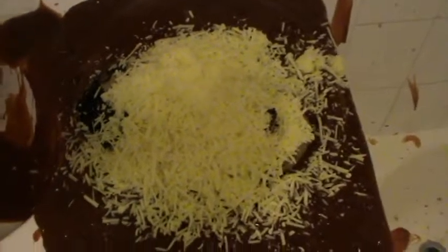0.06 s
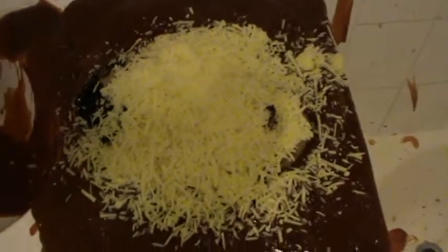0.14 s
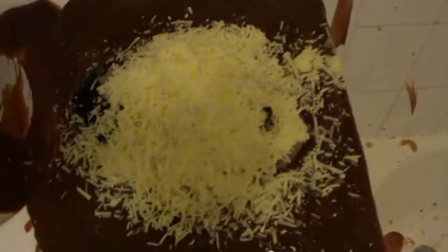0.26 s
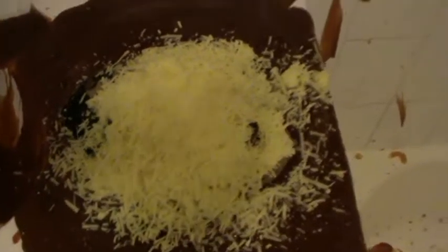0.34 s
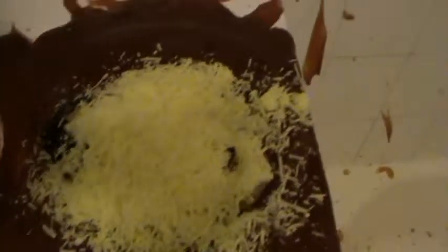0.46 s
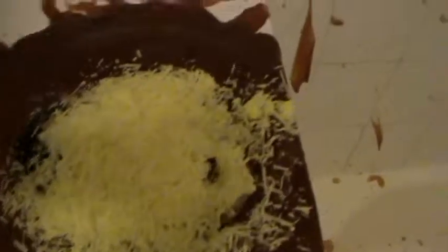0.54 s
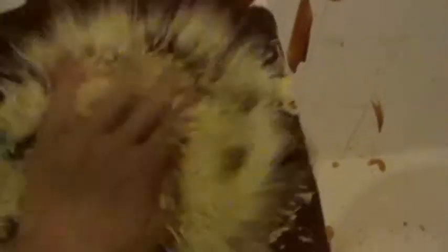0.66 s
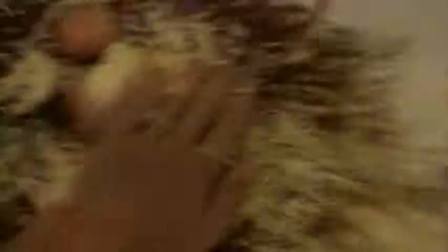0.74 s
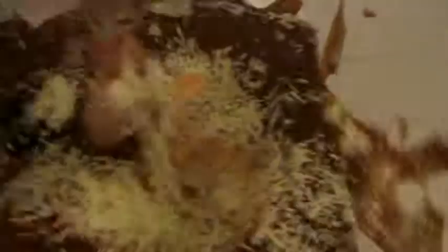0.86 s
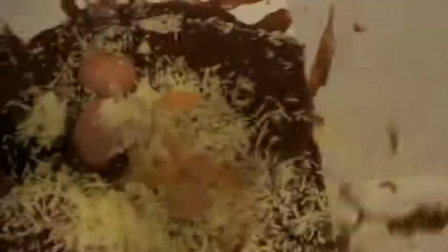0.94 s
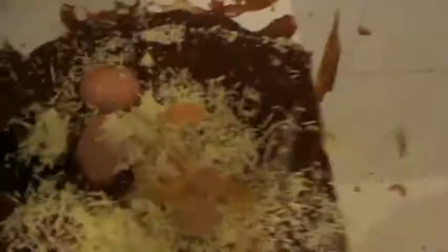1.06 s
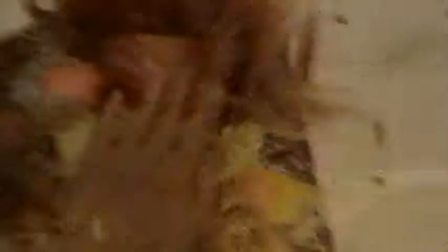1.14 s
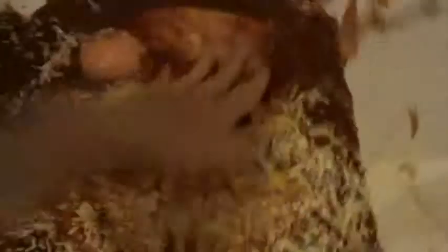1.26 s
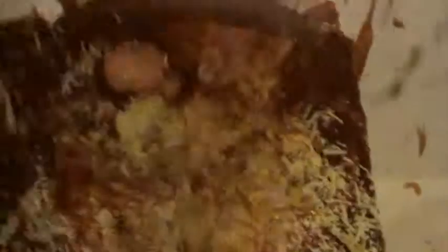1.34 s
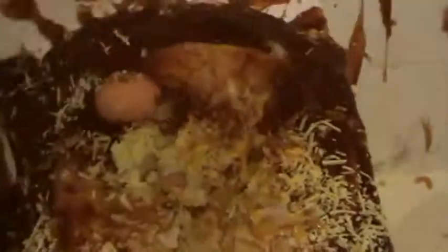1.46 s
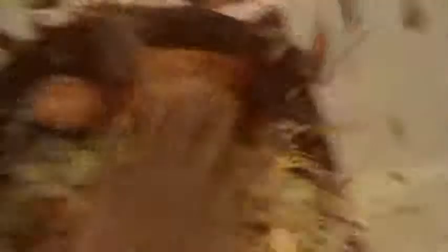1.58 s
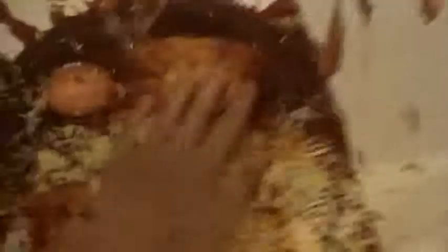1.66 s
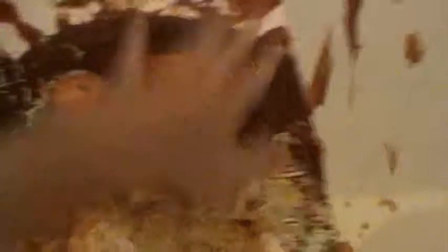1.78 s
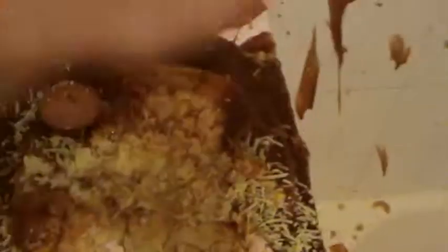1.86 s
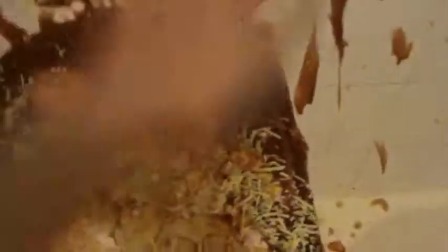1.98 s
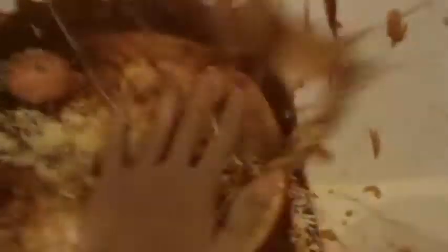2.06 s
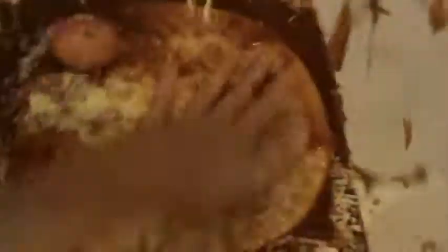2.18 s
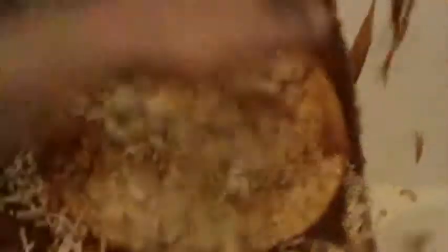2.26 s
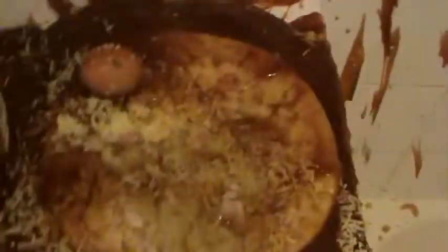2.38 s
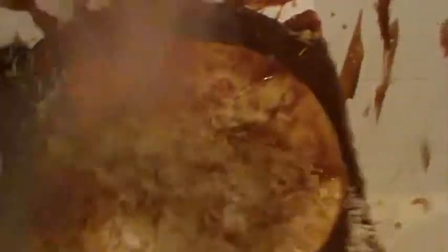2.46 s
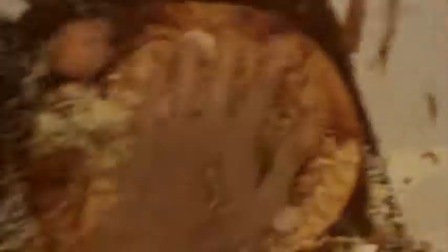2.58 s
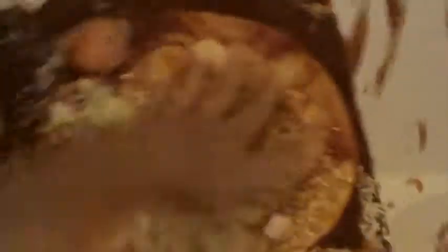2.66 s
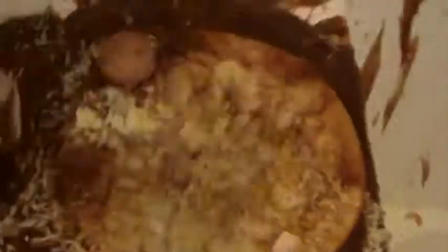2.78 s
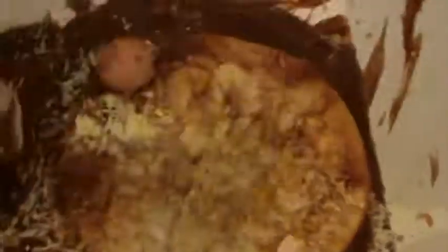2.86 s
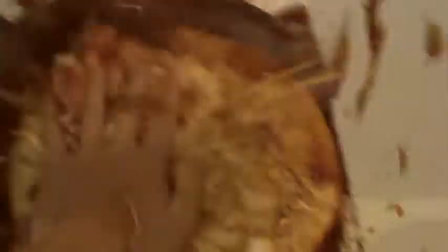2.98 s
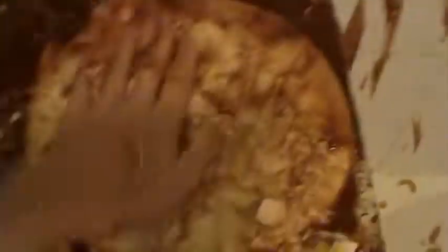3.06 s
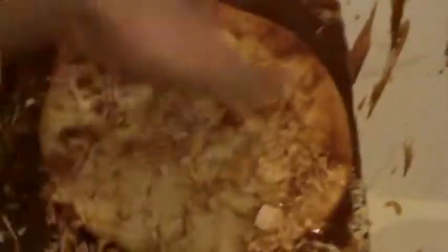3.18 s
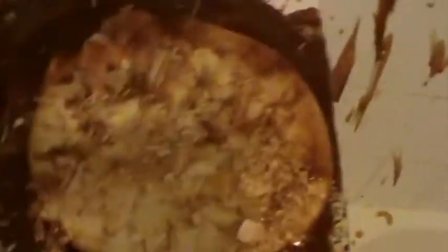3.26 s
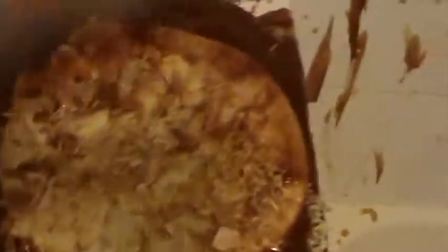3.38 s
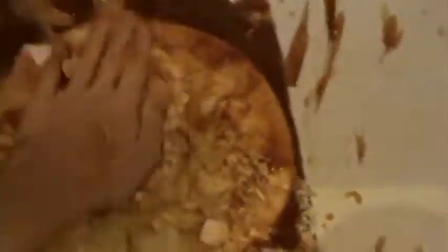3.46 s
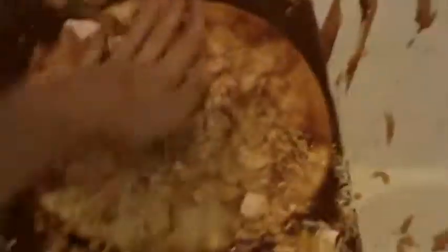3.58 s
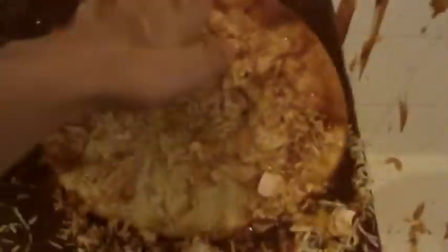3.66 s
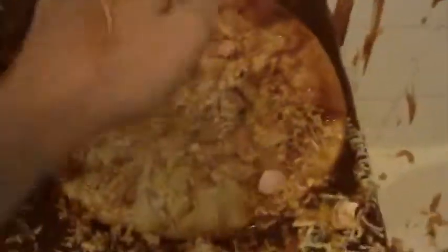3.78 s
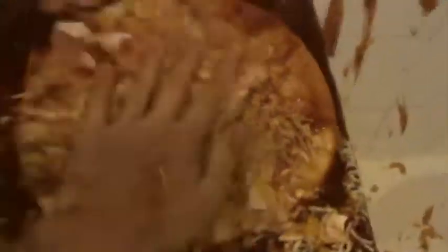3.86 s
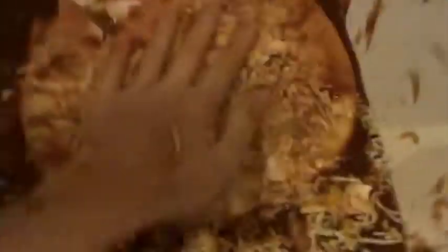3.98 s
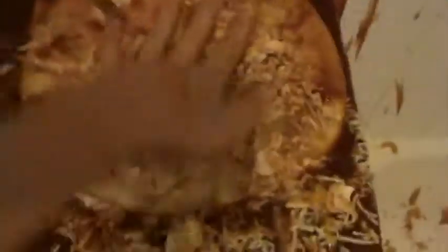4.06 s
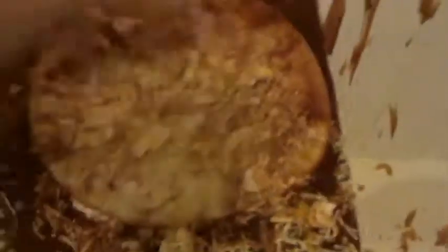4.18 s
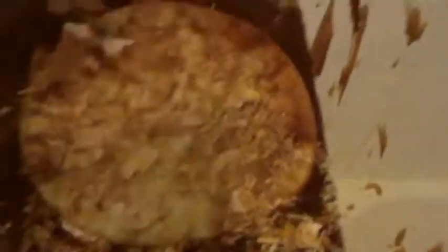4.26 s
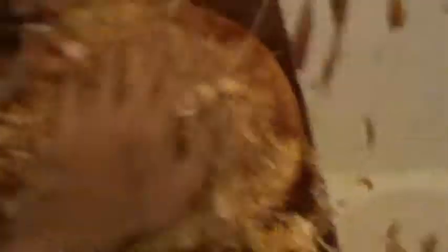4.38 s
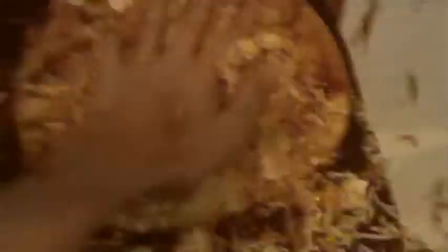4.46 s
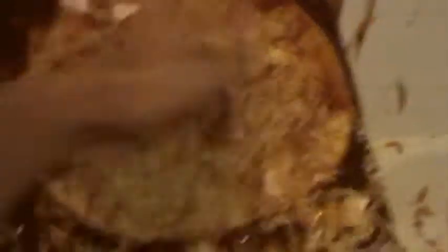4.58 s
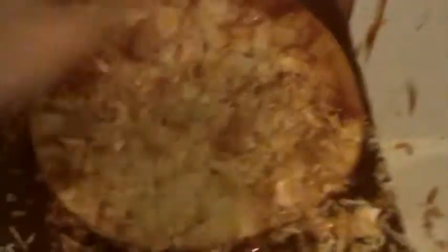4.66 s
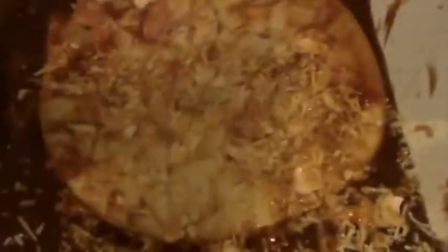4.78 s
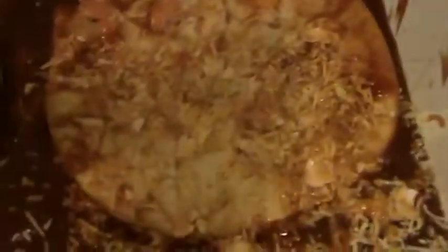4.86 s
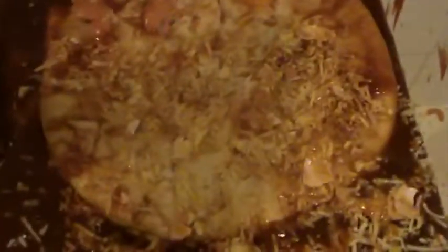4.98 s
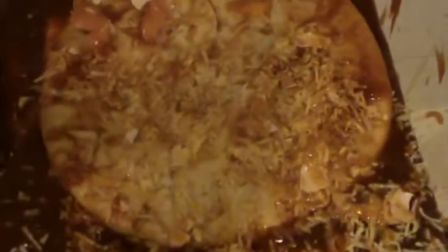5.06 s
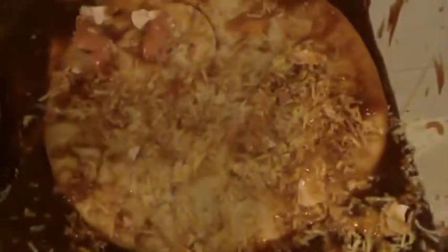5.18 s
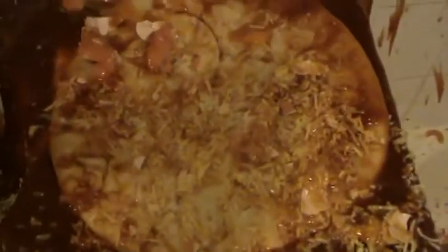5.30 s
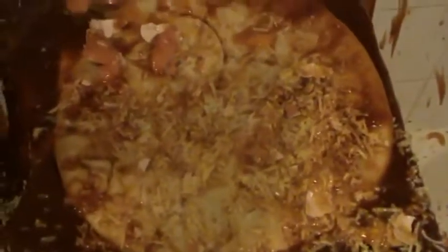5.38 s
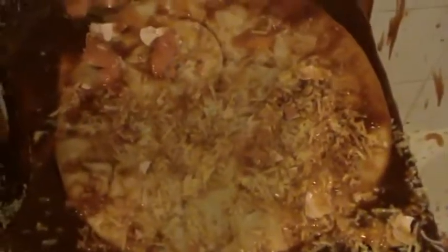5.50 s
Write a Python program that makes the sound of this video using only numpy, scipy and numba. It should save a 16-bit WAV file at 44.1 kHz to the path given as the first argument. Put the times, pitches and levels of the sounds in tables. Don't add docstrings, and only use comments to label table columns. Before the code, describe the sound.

In a small reverberant room, a palm strikes a messy heap of food over and over. Early blows are crunchy and mushy, with clicks of shell and wet plops between; later ones are short, bright cracks with woody booms underneath. Fingertips tap just ahead of some slaps. A hand-held camera close by hisses and ticks faintly, and its limiter flattens the peaks. After the final slap only reverberation and tiny drips remain.

```python
import sys
import numpy as np
from scipy import signal
from scipy.fft import rfft, irfft
from scipy.io import wavfile
from scipy.ndimage import uniform_filter1d
from numba import njit

SR = 44100
rng = np.random.default_rng(int(sys.argv[2]) if len(sys.argv) > 2 else 0)


def boost(x):
    u = np.asarray(x, float) / 20
    return 10 ** u


def to_wav(s):
    ch = np.atleast_2d(s).T
    pcm = np.round(np.clip(ch, -1, 1) * 32767)
    wavfile.write(sys.argv[1], SR, pcm.astype(np.int16))


N = 243873
T = np.arange(N) / SR
SPOTS = 4


def on_log(hz, table, column=1):
    table = np.array(table, float)
    return np.interp(np.log(hz + 1), np.log(table[:, 0] + 1), table[:, column])


def unit(x):
    return x / np.sqrt(np.mean(x ** 2))


def cut(x, hz, kind, order=2):
    return signal.sosfilt(signal.butter(order, hz, kind, fs=SR, output="sos"), x)


def around(x, hz, width):
    return cut(x, [(1 - width) * hz, (1 + width) * hz], "band", order=1)


def add(track, s, x):
    i = int(s * SR)
    x = x[..., :N - i]
    track[..., i:i + x.shape[-1]] += x


def feed(track, k, s, direct, send):
    add(track[0], s, direct)
    add(track[1 + k % SPOTS], s, send)


# (frequency [Hz], density [dB per Hz])
HISS_SPECTRUM = [(25, -10), (60, -9), (130, 1), (250, -7), (400, -8.5), (700, -15), (2000, -16),
                 (5000, -23), (11000, -25.5), (15000, -34.5), (16500, -26)]


def camera(tick_hz=4800, overtone_hz=2013, tick_db=-53, weak_db=-5, hiss_db=-52.5, duck_db=-7):
    hz = np.fft.rfftfreq(N, 1 / SR)
    like = on_log(hz, [(60, 1.0), (300, 0.94), (700, .5), (1400, 0.046), (4000, 0.11), (8000, 0.21),
                       (15000, 0.86)])
    noise = rfft(rng.standard_normal((2, N))) * boost(on_log(hz, HISS_SPECTRUM))
    mid, side = noise * np.sqrt([1 + like, 1 - like])
    hiss = boost(hiss_db) * irfft(np.array([mid + side, mid - side]), N) / np.std(irfft(mid, N))

    ticks, t = np.zeros(N), T[:1024]
    for k, s in enumerate(np.arange(.035, N / SR, .04)):
        ring = np.sin(2 * np.pi * tick_hz * t) + 0.79 * np.sin(2 * np.pi * overtone_hz * t)
        level_db = tick_db + weak_db * (1 - k % 2) + 1.5 * rng.standard_normal()
        add(ticks, s, boost(level_db) * ring * np.exp(-t / .004))
    ticks = ticks * boost(-3.0 * (T > 1))
    return (hiss + ticks) * boost(duck_db * (T > BLOWS[0][0]))


# (time [s], level [dB])
RUSTLE_LEVEL = [
    (0.0, -60),
    (.058, -57),
    (.102, -51),
    (.3, -53.5),
    (.35, -60),
    (.62, -63),
    (.69, -59.5),
]


def rustle(treble_db=-11, puff_db=-41):
    s, db = np.transpose(RUSTLE_LEVEL)
    steps = np.repeat(rng.standard_normal(N // 256 + 1), 256)[:N]
    grain = boost(1.9 * uniform_filter1d(steps, 256))
    noise = rng.standard_normal((3, N))
    low = unit(cut(noise[0] + 0.53 * noise[1:], [250, 800], "band"))
    high = unit(cut(noise[1:], [1200, 11000], "band")) * boost(treble_db)
    puff = boost(puff_db) * np.sin(np.pi * np.clip((T - .675) / 0.047, 0, 1)) ** 2
    return (low + high) * grain * boost(np.interp(T, s, db, right=-120)) + puff


# (frequency [Hz], level [dB], T60 [s], left-right likeness [0-1])
ROOM_BANDS = [(200, 6, 0.99, .95), (400, 5, 0.8, 1), (825, 2, 0.58, 0.1), (1660, 2.5, 0.4, 0.56),
              (3240, -3.5, 0.4, 0.54), (5460, -4.5, 0.4, 0.12), (10400, -8.5, 0.32, 0.9),
              (13400, -21.5, 0.42, 1), (18400, -31.5, 0.27, 1)]


def room(track, build_s=0.0029, near_hz=11000, spread=0.13, tail_db=-27):
    t = T[:SR]
    hz = np.fft.rfftfreq(SR, 1 / SR)
    mid, side = rfft(rng.standard_normal((2, SPOTS, SR)))
    tail = np.zeros((2, SPOTS, SR))
    for centre_hz in 150 * 2 ** (np.arange(14) / 2):
        mask = np.cos(np.pi * np.clip(np.log2(hz / centre_hz + 1e-9), -.5, .5)) ** 2
        like = np.clip(on_log(centre_hz, ROOM_BANDS, column=3), 0, 1)
        m = irfft(mid * mask) * np.sqrt(1 + like)
        s = irfft(side * mask) * np.sqrt(1 - like)
        t60_s = on_log(centre_hz, ROOM_BANDS, column=2)
        tail += np.array([m + s, m - s]) * boost(on_log(centre_hz, ROOM_BANDS) - 60 * t / t60_s)
    tail *= boost(tail_db) * (1 - np.exp(-t / build_s))
    near = spread * rng.standard_normal((2, 24))
    near[:, 0] = 1
    direct = signal.fftconvolve(cut(track[:1], near_hz, "low"), near, axes=1)[:, :N]
    echoes = signal.fftconvolve(track[None, 1:], tail, axes=2)[..., :N].sum(axis=1)
    return direct + echoes


# (time [s], peak [dB], pitch [Hz], bright part [dB])
SAUCE_SPLASHES = [(.092, -35, 4900, -4), (1.111, -18.5, 3060, -10.5), (1.431, -3, 2030, -10.5),
                  (1.8575, -11, 2340, -4.5), (2.0446, -19.5, 5950, -9), (2.3616, -20.5, 2500, 12),
                  (2.5301, -34, 1880, 13), (2.8209, -37.5, 2350, 18), (3.4384, -31.5, 4170, -1),
                  (4.111, -36.5, 2090, -8.5), (4.2609, -23.5, 4200, 4), (4.5696, -20, 2050, -9),
                  (4.911, -47, 4240, 9), (5.0881, -54, 5290, 16.5), (5.4217, -33.5, 2580, 2)]
# (time [s], peak [dB], pitch [Hz], extra room [dB])
CRUMB_TICKS = [(.2213, -48, 3060, 5.5), (.6297, -46, 1600, 4), (.9802, -24, 3000, 2),
               (1.129, -17.5, 1850, -5), (1.3278, -25, 2420, 15), (1.4386, -12, 1830, 6.5),
               (1.72, -9.5, 2050, 3.5), (2.4814, -46, 2610, 3), (2.5154, -33.5, 4070, 8.5),
               (3.356, -37.5, 2360, 1), (3.7, -19, 2020, -14), (4.5904, -38, 2350, -9),
               (4.6615, -23, 3900, -11), (4.809, -37, 4410, 7), (5.004, -38, 4260, 1.5)]
# (time [s], peak [dB], pitch [Hz])
LUMP_PLOPS = [
    (.987, -29, 1700),
    (1.1413, -24.5, 2330),
    (1.5421, -17, 2055),
    (1.761, -11, 2680),
    (3.9103, -40.5, 1830),
    (4.0774, -41.5, 1960),
]


def crumbs(gain_db=13, wet_db=4, ring_width=0.1):
    out, t = np.zeros((1 + SPOTS, N)), T[:512]
    # (s, peak dB, Hz, dull dB, bright dB, room dB, ring dB)
    splashes = [(s, db, hz, -34, bright_db, 1.5, -1) for s, db, hz, bright_db in SAUCE_SPLASHES]
    ticks = [(s, db, hz, -16, -5.5, room_db, 8) for s, db, hz, room_db in CRUMB_TICKS]
    plops = [(s, db, hz, 18.5, 4, 2.5, -1.5) for s, db, hz in LUMP_PLOPS]
    for k, (s, db, hz, dull_db, bright_db, room_db, ring_db) in enumerate(splashes + ticks + plops):
        click = rng.standard_normal(len(t)) * np.exp(-t / 0.00081)
        push = boost(wet_db + room_db) * (t == 0)
        click = cut(np.array([click / np.linalg.norm(click), push]), 1000, "high")
        dull = boost(dull_db - 9) * cut(click, 3100, "low")
        middle = cut(cut(click, 3800, "low"), 2840, "high")
        ring = boost(ring_db) * around(click, hz, ring_width)
        bright = boost(bright_db) * cut(click, 6700, "high")
        feed(out, k, s, *boost(db + gain_db) * (dull + middle + ring - bright))
    return out


# (time [s], peak [dB], pitch [Hz], rise [s])
FINGER_TAPS = [(.3125, -43.5, 3560, 0.0016), (.855, -20, 2650, 0.0033), (.992, -25.5, 3970, 0.001),
               (1.012, -24.5, 2040, 0.0023), (1.4385, -4, 2210, .0004), (2.3615, -15.5, 2520, 0.00071),
               (2.5525, -10.5, 1200, 0.0013), (2.94, -41, 1700, .001), (2.967, -34, 1390, 0.0013),
               (3.0155, -11.5, 990, 0.0015), (3.139, -4, 2430, 0.00043), (3.7715, -11.5, 1810, 0.00097),
               (4.5765, -24, 3020, 0.00061)]


def taps(rough=0.64, wet_db=-15):
    out, t = np.zeros((1 + SPOTS, N)), T[:2048]
    for k, (s, db, hz, rise_s) in enumerate(FINGER_TAPS):
        ripple = 1 + rough * rng.standard_normal(len(t))
        swell = (t / rise_s) ** 2 * np.exp(2 - 2 * t / rise_s)
        pop = boost(db) * np.sin(2 * np.pi * hz * t) * ripple * swell
        feed(out, k, s, pop, boost(wet_db) * pop)
    return out


# (frequency [Hz], level [dB], T60 [s])
ROOM_MODES = [(30, -30.5, .3), (50, -1.5, 0.75), (75, -8.5, 0.93), (90.8, 1, 0.5), (111.5, -10.5, 0.68),
              (135, 3, 0.72), (158, -6, 0.44), (184.3, -4, 1), (223, -0.5, 0.69), (241.5, -4, 0.81),
              (259.3, -7, 1), (299, -6.5, 1), (309.5, -5.5, 0.94), (357, -4, 0.82), (390, -2, 0.74),
              (420, -11, 0.92), (494, -2.5, 0.74), (493, 1, 0.68), (542, 0, 0.63), (574, -3.5, 0.2)]
# (time [s], level [dB], centre [Hz], reach [octaves])
BOARD_THUDS = [(.713, -7, 179.7, 0.29), (.76, -8, 75, .28), (1.182, -6, 200, 0.99), (1.27, 2.5, 106, 0.7),
               (1.442, -6.5, 420, 0.28), (1.623, 11.5, 294, 0.58), (2.098, 4, 289, 0.64),
               (2.36, -27, 308, 0.36), (2.559, 6, 311, 0.73), (3.022, 4.5, 327, 0.46),
               (3.049, 1, 390, 0.056), (3.49, -3.5, 338, 1), (3.749, -21.5, 400, 0.62),
               (3.772, 8, 209, 0.24), (3.774, -4, 132, 0.23), (3.923, 5, 309, 0.47),
               (4.4241, 4.5, 290, 0.56)]


def boom(scatter_db=0.5, gain_db=-9, skew=0.21, swell_cycles=2.48, wobble_db=4.5, drift_rad=1.0):
    out, t = np.zeros((2, N)), T[:SR]
    hz, db, t60_s = np.transpose(ROOM_MODES)
    for s, thud_db, centre_hz, reach_oct in BOARD_THUDS:
        far_db = -8 - 3 / reach_oct
        swell_s = swell_cycles / centre_hz
        chance = rng.standard_normal((5, len(hz)))
        near_db = np.maximum(-6 * (np.log2(hz / centre_hz) / reach_oct) ** 2, far_db)
        size = boost(gain_db + thud_db + db + near_db + scatter_db * chance[0])
        steps = np.repeat(rng.standard_normal((2, len(hz), 23)), SR // 22, axis=2)[..., :SR]
        waver = uniform_filter1d(steps, SR // 22)
        cycles = np.outer(hz * (1 + 0.0042 * chance[1]), t) + chance[2][:, None]
        turn = 2j * np.pi * cycles + 1j * drift_rad * waver[1]
        fade = boost(wobble_db * waver[0] - 60 * t / t60_s[:, None])
        rings = np.exp(turn) * fade * (1 - np.exp(-t / swell_s))
        lean = np.exp(skew * (.5 * chance[3] + 1j * chance[4]) / 2)
        add(out, s, (np.array([size * lean, size / lean]) @ rings).imag)
    return out


# (time [s], crack [dB], treble [dB], squash decay [s], pitch of air under the palm [Hz])
BLOWS = [(.710, -5, 3.5, 0.061, 1620), (1.163, -12.5, 5, 0.09, 3300), (1.185, 0, 0, 0.056, 1620),
         (1.27, -6.5, 6, 0.077, 600), (1.44, 4.5, -6, 0.02, 1590), (1.623, 12, 7, 0.0034, 980),
         (2.098, 5, 8.5, 0.0081, 2540), (2.559, 8.5, 3.5, 0.0096, 1200), (3.022, 10, 3, 0.0064, 726),
         (3.49, 8.5, 3.5, 0.0057, 1840), (3.745, -12, -17, 0.014, 704), (3.771, -5, -8, 0.0013, 1580),
         (3.922, 6.5, 3, 0.0079, 1920), (4.422, 7.5, 2.5, 0.0034, 866)]


def slaps(squash_db=-16, spray_db=-31.5, soft_db=6, near_db=-12, push_db=14, spray_wet_db=-2,
          linger_db=-29.5, body_db=6, palm_db=2, palm_width=0.11):
    out, t = np.zeros((1 + SPOTS, N)), T[:SR // 2]
    for k, (s, crack_db, treble_db, squash_s, palm_hz) in enumerate(BLOWS):
        direct_db = min(-8.5 - 1.8 * treble_db, -7) - 0.21 * crack_db
        noise, size, land = rng.standard_normal(len(t)), rng.exponential(1, len(t)), rng.random(len(t))
        size = np.minimum(size, 3)
        crack = noise * np.exp(-t / 0.0025) * (1 - np.exp(-t / 0.00031))
        squash = boost(squash_db) * noise * np.exp(-t / squash_s)
        grain = boost(6.9 * np.repeat(size, 64)[:len(t)])

        bits = np.convolve(boost(size) * (land < .003), np.exp(-T[:64] / 0.00043))[:len(t)]
        spray = boost(spray_db) * cut(bits * noise[::-1], [1800, 11000], "band")
        spray = spray * (np.exp(-(t / 0.18) ** 2) + boost(linger_db))

        near = boost(near_db) * (boost(direct_db) * crack + squash * grain)
        send = boost(soft_db) * squash * (1 - np.exp(-t / 0.025)) + boost(push_db) * (t == 0)
        blow = np.array([near, send])
        low = cut(blow, 3000, "low")
        body = (boost(body_db) - 1) * cut(blow, [620, 980], "band", order=1)
        palm = boost(palm_db) * around(blow, palm_hz, palm_width)
        treble = boost(treble_db) * (blow - low + np.outer([1, boost(spray_wet_db)], spray))
        feed(out, k, s, *boost(crack_db) * (low + palm + body + treble))
    return out


# (frequency [Hz], left phase lead [rad])
PORT_LEAD = [(0, 0.76), (260, -0.83), (600, -1.33), (1550, 0.85), (3190, 0.34), (5860, -1.1), (6980, 0.64),
             (9730, 0.94), (12100, 1), (16500, 0.0)]
# (frequency [Hz], left minus right [dB])
PORT_LEVEL = [(60, -1), (110, 0), (200, -1), (380, -1), (700, -3.5), (1290, -2.5), (2380, -1), (4400, -1),
              (8120, -1), (15000, 0.5)]


def scene():
    air = rfft(room(slaps() + taps() + crumbs()) + boom())
    hz = np.fft.rfftfreq(N, 1 / SR)
    half = boost(on_log(hz, PORT_LEVEL) / 2) * np.exp(.5j * on_log(hz, PORT_LEAD))
    return irfft(air * np.array([half, 1 / half]), N) + rustle() + camera()


@njit
def limiter(peak, top, attack, release):
    gain, e = np.empty(len(peak)), 0.
    for i in range(len(peak)):
        e += (peak[i] - e) * (attack if peak[i] > e else release)
        gain[i] = top / max(e, top)
    return gain


def roll_off(x):
    return signal.sosfilt(signal.butter(12, 17000, fs=SR, output="sos"), x)


def record(dry, limit_db=-8.5, attack_s=.0011, release_s=0.0035, top_hz=15800):
    peak = np.abs(dry).max(axis=0)
    gain = limiter(peak, boost(limit_db), 1 / (attack_s * SR), 1 / (release_s * SR))
    held = np.tanh(dry * gain) / 1.068
    held = signal.sosfilt(signal.ellip(8, .2, 60, top_hz, fs=SR, output="sos"), held)
    return roll_off(held)


dry = scene()
out = record(dry)
to_wav(out)
```